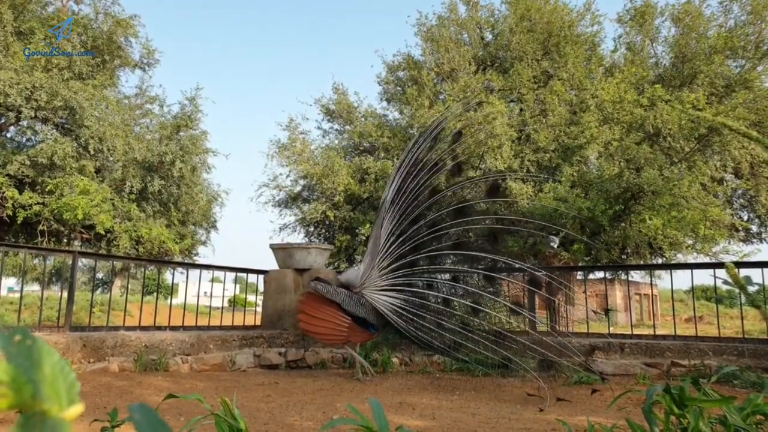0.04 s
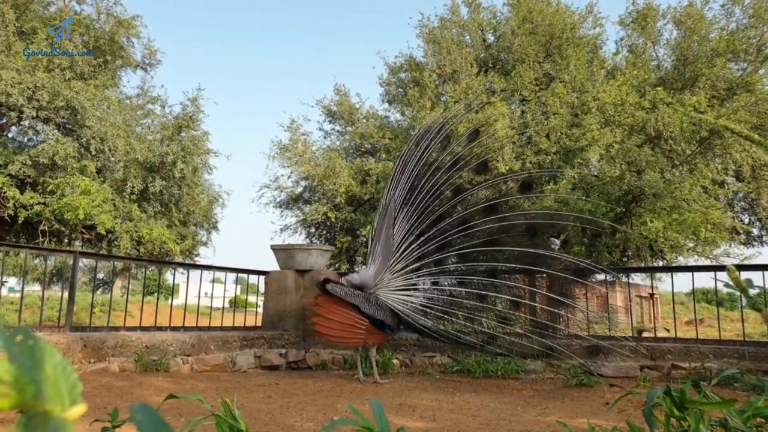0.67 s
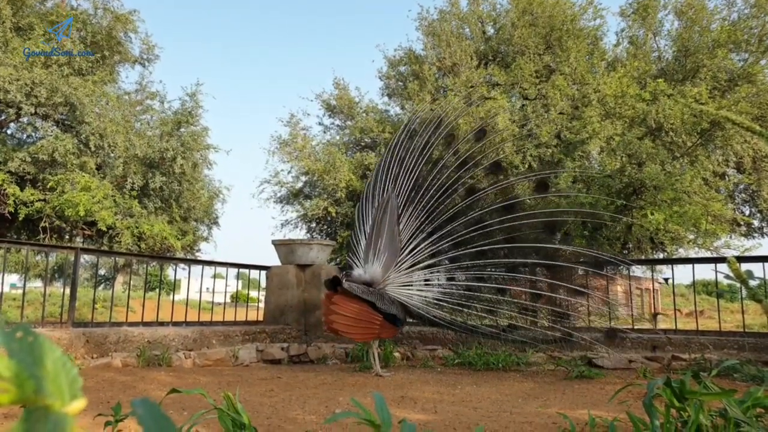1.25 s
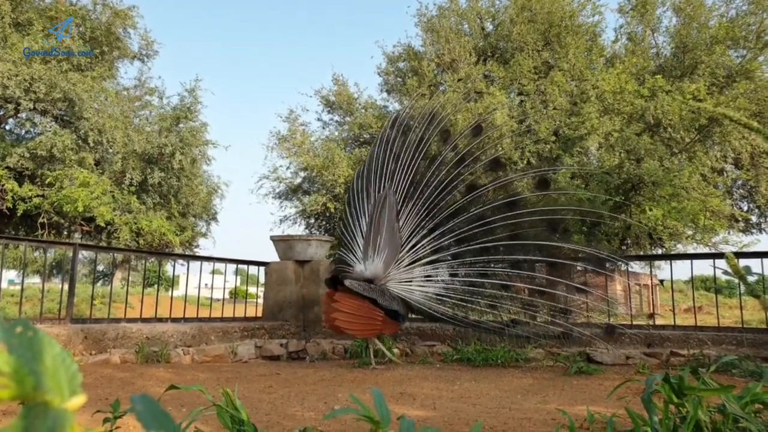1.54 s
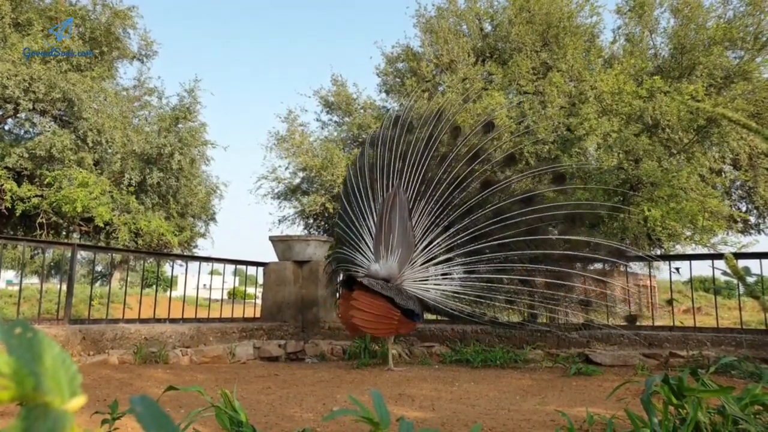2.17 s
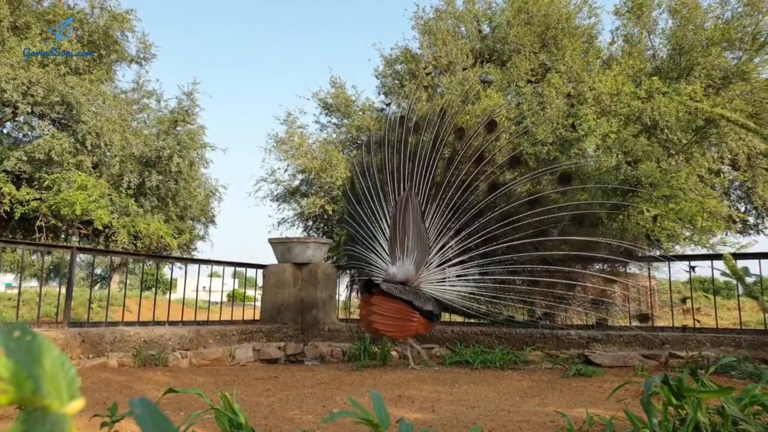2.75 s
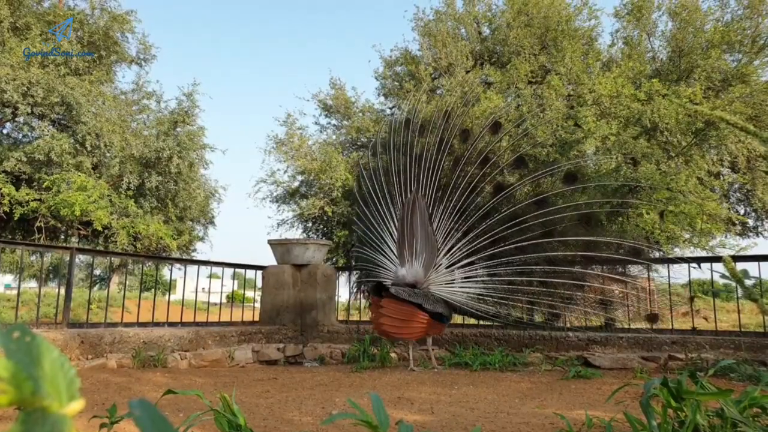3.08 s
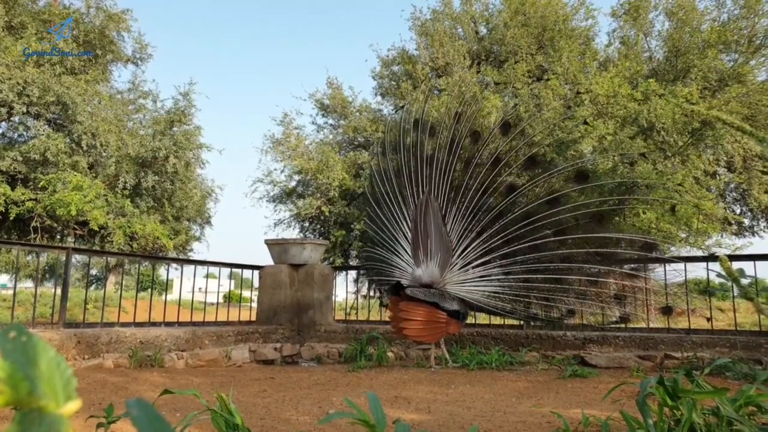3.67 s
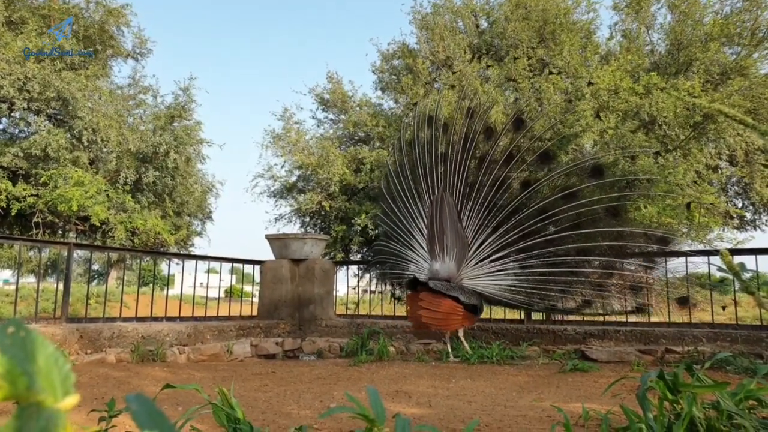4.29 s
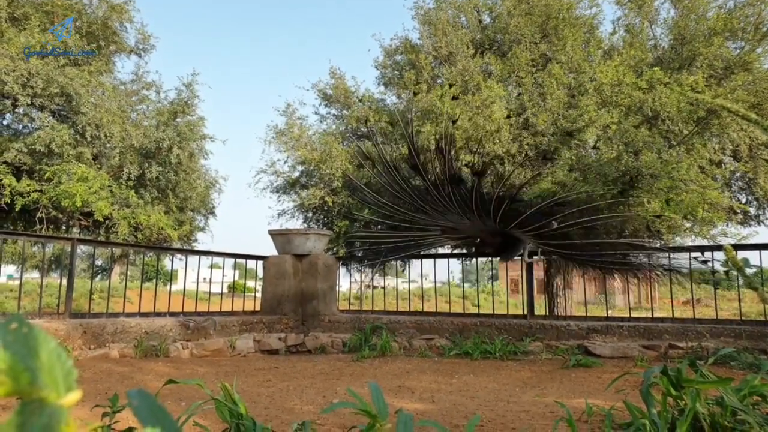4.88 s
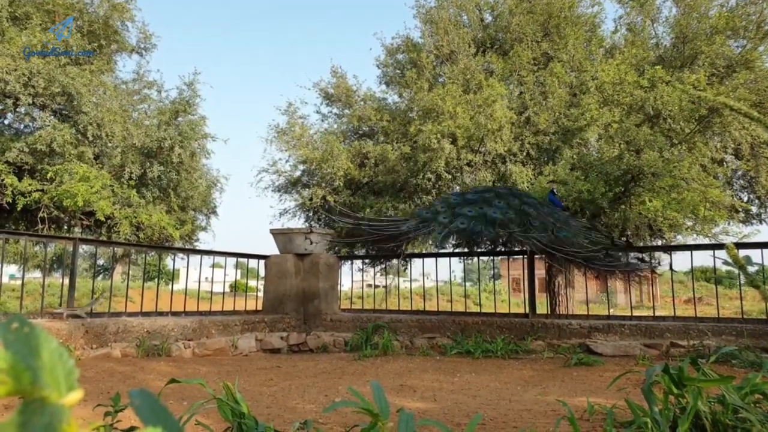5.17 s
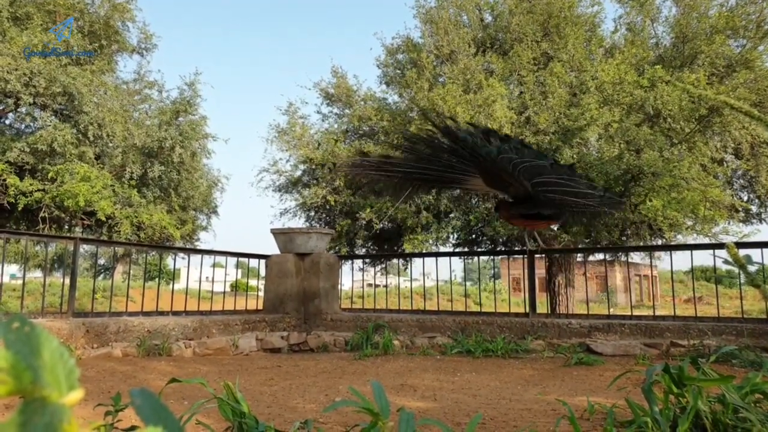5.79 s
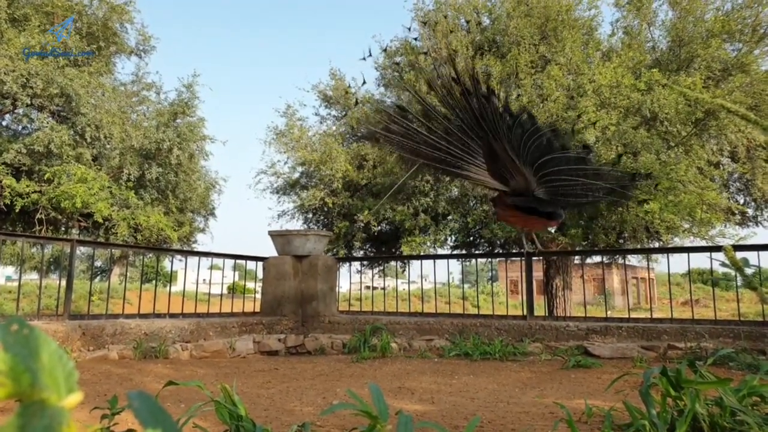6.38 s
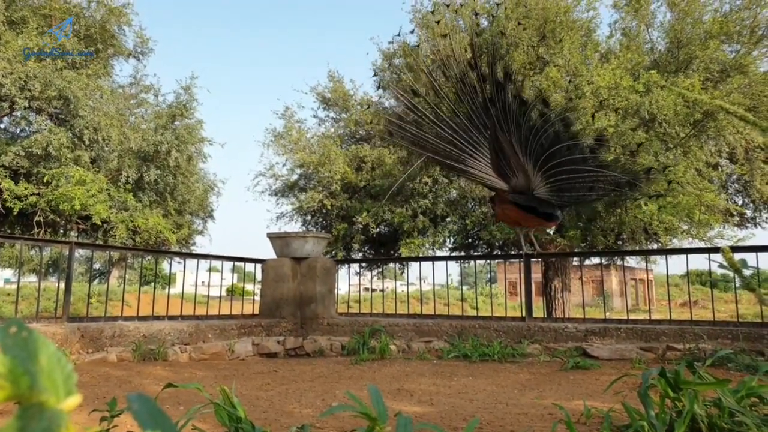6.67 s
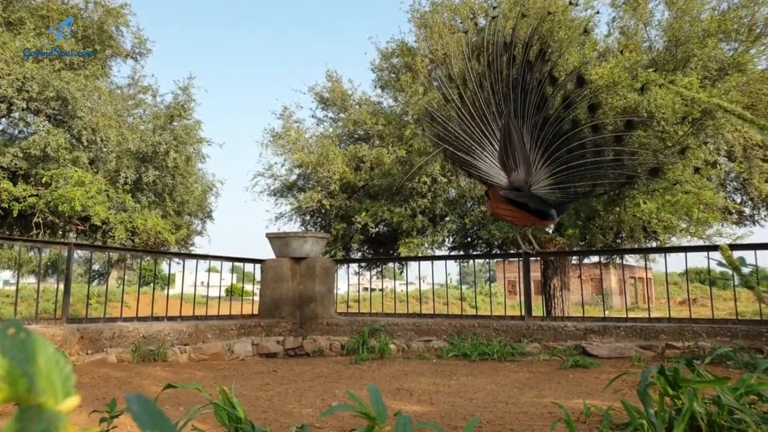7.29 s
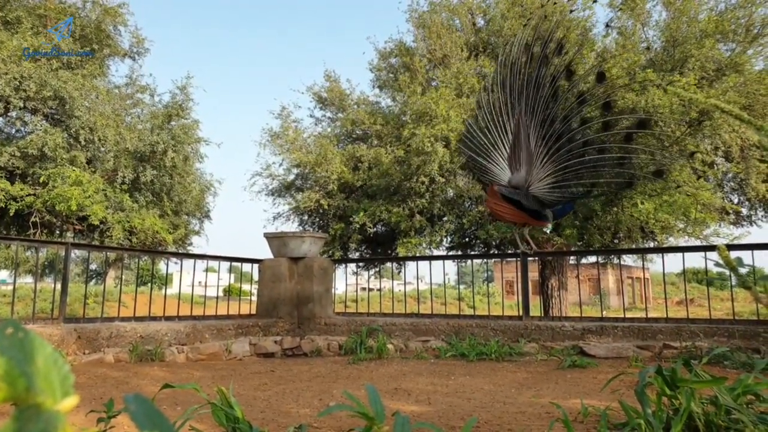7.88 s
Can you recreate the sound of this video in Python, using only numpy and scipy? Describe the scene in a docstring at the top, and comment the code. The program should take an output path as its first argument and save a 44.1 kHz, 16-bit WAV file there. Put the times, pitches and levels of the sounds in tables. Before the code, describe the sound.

The sound opens in an outdoor yard with a faint hum and hiss, and a light breeze rumbling unevenly on the microphone throughout. Distant peafowl give arched, wailing cries at about 0.8, 1.8 and 2.9 seconds, among scattered hoarse squawks, thin whistles and twitters from small birds. A peacock close by gives three loud, short, harsh honks with a brassy flutter at about 3.8, 4.3 and 5.3 seconds. His feathers rustle softly and quills snap between 4.6 and 5.2 seconds. Small birds continue, with clearer squawks at 5.6, 6.3 and 6.8 seconds. His feet click lightly on a railing at 6.7 and from 7.4 to 7.8 seconds, and his quills rattle faintly until the end, around 8 seconds. Dull handling bumps come near 0.3, 2.7, 6.7 and 7.6 seconds, the strongest at 6.7. The calls carry a slight outdoor echo.

```python
"""Three harsh, fluttering honks from a peacock displaying close by in a yard; his quills rustle and he hops
onto a railing. His syrinx buzzes, a fast flutter chops the buzz, and his windpipe turns it brassy.
Farther off, other peafowl wail and small birds squawk, whistle and twitter over a faint hum and hiss.
Low walls and trees answer the calls. A breeze buffets the microphone's two unlike ports, and handling
adds soft bumps."""
import sys
import numpy as np
from scipy import signal
from scipy.fft import rfft, irfft, next_fast_len
from scipy.io import wavfile
from scipy.ndimage import uniform_filter1d, map_coordinates

SR = 44100
rng = np.random.default_rng(int(sys.argv[2]) if len(sys.argv) > 2 else 0)


def dump_mix(stems):
    """Bounce the given channels to the path in sys.argv[1] as a 16-bit WAV at rate SR."""
    frames = np.atleast_2d(stems).T  # one column per channel
    limited = np.clip(frames, -1, 1)  # hard clip at full scale
    pcm = np.round(limited * 32767).astype(np.int16)
    wavfile.write(sys.argv[1], SR, pcm)


N = 358974
TOP_HZ = 15500  # upper edge of the microphone's band


def honks(length_s=0.25, attack_s=0.08, release_s=0.056, opening_s=0.11, hold_hz=396, roughness=0.26):
    """Close by, the syrinx buzzes; a flutter chops it and bends its pitch, and each puff carries a rasp."""
    # the peacock's calls: t/s, level/dB, rasp/dB
    calls = [(3.78, -30.5, -4.5), (4.274, -29.5, -3.5), (5.298, -29.5, -3.5)]
    # the voice's colour at the left and at the right port: f/Hz, gain/dB
    left_colour = [(300, -19), (450, -38), (700, -13), (1020, -7), (1550, -2), (2100, -2), (2600, -36),
                   (3300, -18.5), (4100, -17), (5200, -20), (7000, -24), (9000, -26), (11800, -22.5),
                   (15000, -38)]
    right_colour = [(300, -58.5), (570, -2), (790, -4.5), (1020, -11.5), (1250, 1.5), (2330, -6.5),
                    (3250, -28.5), (3850, -9), (4600, -20), (6100, -8.5), (7600, -15), (11500, -15.5),
                    (13500, -45)]
    out = np.zeros((2, N))
    t = clock(0, length_s)
    slack = np.clip(1 - t / attack_s, 0, 1)
    collapse = np.clip(1 - (length_s - t) / release_s, 0, 1)
    effort_db = -26 * (slack ** 1.32 + collapse ** 1.72)
    pitch = hold_hz - 80.95 * np.exp(-(t / 0.064) ** 2) - 161.4 * collapse  # scoops up, holds, drops
    depth = 0.083 + 0.85 * slack ** 2 + 0.18 * collapse  # a weak voice breaks up into single puffs
    bright_db = 5 * slack - 26 * collapse ** 2
    order = np.arange(1, 38)[:, None]
    lag = np.pi * order ** 2 / (2 * len(order))  # the windpipe smears each pulse over part of its cycle
    beak_hz = 1530 + 1260 * t - 735 * collapse  # this resonance rises as the beak opens, falls as it shuts
    beak_lift = amp(4 * np.exp(-((order * pitch - beak_hz) / 400) ** 2))
    opened = np.clip(t / opening_s, 0, 1) ** 2
    for start, db, rasp_db in calls:
        flutter_hz = (84.5 - 67 * t) * (1 + 0.015 * wobble(t, 50))
        flutter = np.sin(cycles(flutter_hz))
        phase = cycles(pitch * (1 + 0.066 * flutter + 0.01094 * wobble(t, 350.3)))
        buzz = unit((beak_lift * np.cos(order * phase + lag)).sum(axis=0))
        breath = rng.standard_normal(len(t))
        scattered = tint(rng.standard_normal((2, len(t))), [(2000, 1.5), (4000, 3)])
        air = unit((breath + 0.97 * scattered) * (0.97 + np.cos(phase)))
        source = buzz + roughness * colour(air, [(600, -30), (2000, 19), (5000, 17)])
        # the flutter chops the lowest harmonics and the rasp more deeply than the blare between them
        low = tint(source, [(950, -3), (1200, -20.5)]) * (1 + 1.46 * flutter) * amp(-1.5)
        blare = tint(source, [(950, 0.5), (1150, -1), (1500, 1.5), (2800, 6.5), (3600, -12.5)])
        blare *= 1 + depth * flutter
        rasp = windpipe(tint(source, [(3200, -23), (3650, 2)])) * amp(5 * flutter + rasp_db + bright_db)
        # the top of the rasp only gets out once the beak is wide open
        rasp = opened * rasp + (1 - opened) * tint(rasp, [(8500, 2), (9300, -12)])
        left, right = spaced(low, samples=14) + spaced(blare + rasp, samples=20)
        pair = np.array([tint(left, left_colour), tint(right, right_colour)])
        honk = unit(quickened(pair, share=0.0665))
        add(out, start, honk * amp(db + effort_db + 0.5) * fade(t, 0.00056))
    return yard(out, wall_db=-12, tail_db=-29)


def windpipe(x):
    """Narrow resonances of the windpipe make the rasp brassy."""
    # windpipe resonances: f/Hz, width/Hz, lift over the valleys/dB
    resonances = [(3750, 230, 6.5), (6150, 114, 11), (6390, 130, 0), (8170, 400, 4.5), (11500, 300, 4)]
    hz = np.arange(1, 320) * 50.0
    lift_db = sum(db * np.exp(-((hz - centre) / width) ** 2) for centre, width, db in resonances)
    return tint(x, np.transpose([hz, lift_db - 3]))


def feathers_and_feet(shiver_hz=40, click_t60=0.01, ring_t60=0.015, rattle_hz=36):
    """The near bird's quills slide, snap and rattle as his train shivers; his feet click on the railing."""
    # rustling strokes of the train: t/s, length/s, level/dB
    strokes = [(4.036, 0.26, -74.5), (4.646, 0.2, -61.5), (4.792, 0.064, -59.5), (4.878, .22, -64.5),
               (5.144, 0.066, -61.5)]
    # sharp clicks of quills snapping and of feet landing on the railing: t/s, level/dB, ring f/Hz
    clicks = [(3.4934, -46.5, 3400), (4.6628, -39.5, 3660), (4.7366, -43, 2900), (4.81, -30.5, 10770),
              (4.9842, -44.5, 5000), (5.1647, -31.5, 2730), (6.7234, -37.5, 5040), (7.3876, -44, 5280),
              (7.59, -53, 5330), (7.6466, -49, 5650), (7.7112, -45.5, 5430), (7.7545, -41, 5080),
              (7.8007, -46.5, 5870)]
    # colour of the rustle and clicks: f/Hz, gain/dB
    rustle_colour = [(300, 1.5), (1400, -10), (2800, 3), (4200, -4), (5200, -0.5), (8500, -5),
                     (11000, -0.5), (14000, -4), (16000, -17)]
    out, rings = np.zeros((2, N)), np.zeros(N)
    for start, length, db in strokes:
        t = clock(start, start + length)
        swell_db = np.interp(t - start, [0, 0.28 * length, length], [-12, 0, -12])
        shiver = np.cumsum(shiver_hz * amp(2.2 * wobble(t, 30))) / SR % 1  # each starts sharply and dies
        friction = rng.standard_normal((2, len(t)))
        grains = unit(friction * amp(3 * wobble(t, 297) - 12 * np.sqrt(shiver)))
        add(out, start, grains * amp(db + swell_db + 11) * fade(t, 0.014))
    t = clock(0, 0.021)
    decay = amp(-60 * t / click_t60)
    for start, db, hz in clicks:
        add(out, start, rng.standard_normal((2, len(t))) * decay * amp(db - 7))
        add(rings, start, np.sin(2 * np.pi * hz * t) * amp(db - 5 - 60 * t / ring_t60))
    for beat in np.arange(7.56, 8.12, 1 / rattle_hz):  # the raised train trembles
        start = beat + rng.normal(0, 0.005)
        crack = rng.standard_normal((2, len(t))) * decay
        add(out, start, crack * amp(-60.5 + rng.normal(0, 3)))
    return yard(colour(out, rustle_colour) + rings, wall_db=-2, tail_db=-30)


def wails(sag=0.22, edge_db=-24, roughness=0.4):
    """Peafowl farther off: arched cries, loudest at their top and hoarse in the upper harmonics."""
    # the cries: t/s, length/s, top f/Hz, level/dB, treble/dB, left-right/dB
    cries = [(0.561, 0.32, 655, -63.5, 2.5, 0.5), (0.768, 0.34, 745.7, -52, 1, 0),
             (1.767, 0.34, 732.5, -50.5, 6.5, 1), (2.9, .34, 650.4, -52, 12, 7.5),
             (7.249, 0.17, 786, -69, -36, -8)]
    # resonances of the throat: f/Hz, gain/dB
    throat = [(400, -39), (640, -4.5), (750, 2.5), (1000, -6), (1330, -2), (1800, -18), (2550, 6),
              (3150, -6.5), (3750, 7), (4500, -16), (5600, -2.5), (7000, -18), (9500, -30), (13000, -36)]
    out = np.zeros((2, N))
    for start, length, top_hz, db, treble_db, pan_db in cries:
        t = clock(start, start + length)
        droop = np.linspace(-1, 1, len(t)) ** 2
        phase = cycles(top_hz * (1 - sag * droop) * (1 + 0.019 * wobble(t, 300)))
        buzz = unit(np.cos(np.arange(1, 19)[:, None] * phase).sum(axis=0))
        air = colour(rng.standard_normal(len(t)), [(700, -10), (2500, 1), (6000, 7), (12000, 2)])
        voice = colour(buzz + roughness * air, throat)
        cry = unit(tint(voice, [(1000, 0), (2600, treble_db / 2), (8000, treble_db), (14000, 0)]))
        add(out, start, sides(pan_db) * cry * amp(db + edge_db * droop ** 1.9) * fade(t, 0.0082))
    return yard(spaced(out, samples=10), wall_db=-5, tail_db=-10)


def squawks(top_share=0.3, hoarse_db=-14, jitter=0.02):
    """Hoarse notes that leap to a top and slide down, sung by both halves of a small bird's syrinx."""
    # the notes: t/s, length/s, top f/Hz, slide/octaves, level/dB, tilt/dB per octave, left-right/dB
    notes = [(0.275, .115, 2253, 0.49, -51.5, 5.5, 0.5), (0.944, 0.057, 2290, 0.62, -56.5, 4, -2),
             (1.185, 0.082, 2440, 0.52, -66.5, -13, 8), (1.331, 0.15, 2854, 0.54, -65, 3.5, 0.5),
             (1.535, 0.094, 2217, 0.49, -53.5, 5, -0.5), (2.203, 0.087, 2178, 0.53, -58, 5, 3),
             (2.834, 0.091, 2140, 0.3, -56, 9, 2), (4.137, 0.088, 2045, 0.35, -50.5, 1.5, 1.5),
             (4.612, 0.12, 1890, .3, -57, 8, 12), (4.825, 0.11, 1990, .3, -52, 9, 12),
             (5.64, .11, 2094, .55, -48.5, 6, 0.5), (6.335, .16, 2310, 0.62, -41.5, 10, 7.5),
             (6.754, .18, 1840, 0.26, -46, 14, 11.5), (7.155, 0.16, 1767, 0.2, -74.5, 3, -9),
             (7.779, 0.17, 1744, 0.27, -67, 4.5, -6)]
    # resonances of the throat: f/Hz, gain/dB
    throat = [(1400, 9.5), (2100, -3), (3000, 8.5), (3750, 7.5), (4700, 1), (5700, 1), (6600, -14),
              (7600, -13), (9200, -18.5), (13000, -42)]
    halves = [(0, 1, 0), (0.018, 0.9, -8)]  # delay/s, pitch ratio, level/dB
    order = np.arange(2, 14)[:, None] / 2
    hoarseness = np.where(order % 1, amp(hoarse_db), 1)  # weaker lines halfway between the harmonics
    out = np.zeros((2, N))
    for start, length, top_hz, slide, db, tilt_db, pan_db in notes:
        t = clock(start, start + length)
        progress = np.linspace(0, 1, len(t))
        leap = 0.67 * (1 - progress / top_share) ** 2
        fall = abs((progress - top_share) / (1 - top_share)) ** 1.5
        below_top = np.where(progress < top_share, leap, fall)
        for delay, ratio, half_db in halves:
            pitch = ratio * top_hz * 2 ** (-slide * below_top)
            hz = order * pitch
            weight = amp(along(throat, hz) + tilt_db * np.log2(order)) * hoarseness * (hz < TOP_HZ)
            flicker = amp(4 * np.array([wobble(t, 45) for _ in order]))
            phase = cycles(pitch * (1 + jitter * wobble(t, 351.3)))
            note = unit((weight * flicker * np.sin(order * phase)).sum(axis=0))
            add(out, start + delay, sides(pan_db) * note * fade(t, length / 4) * amp(db + half_db - 1))
    return out


def whistles(jitter=0.015):
    """Small birds slur one thin line up or down."""
    # the slurs: t/s, length/s, from f/Hz, to f/Hz, level/dB
    slurs = [(1.148, 0.063, 3350, 3770, -59), (2.113, 0.043, 5750, 5050, -69),
             (5.014, 0.022, 2700, 4440, -56.5), (5.07, 0.039, 3950, 2350, -52),
             (5.123, 0.072, 3900, 3370, -60), (5.954, 0.075, 3870, 5080, -65.5),
             (6.145, .07, 5350, 4900, -71.5), (7.342, 0.034, 5400, 5020, -71),
             (7.55, 0.057, 5450, 5080, -68.5), (7.665, 0.059, 5400, 5050, -67),
             (7.889, 0.051, 5450, 5000, -60.5)]
    out = np.zeros(N)
    for start, length, from_hz, to_hz, db in slurs:
        t = clock(start, start + length)
        pitch = np.geomspace(from_hz, to_hz, len(t)) * (1 + jitter * wobble(t, 228))
        add(out, start, unit(np.sin(cycles(pitch))) * fade(t, length / 4) * amp(db))
    return out


def small_birds():
    """Squawks and whistles reach the microphone from the same trees."""
    return yard(spaced(squawks() + whistles(), samples=14), wall_db=-5, tail_db=-9)


def twitters(sweeps_per_s=45):
    """Distant, scratchy runs of very quick sweeps, each run sinking in pitch."""
    # the runs: t/s, length/s, nominal sweep from f/Hz, to f/Hz, level/dB, left-right/dB
    runs = [(0, .19, 3850, 2517, -63.5, 4), (1.839, 0.074, 3400, 2530, -64, -18),
            (2.424, 0.096, 4050, 2940, -68, 16), (2.657, 0.098, 4140, 3000, -68, 13),
            (3.411, 0.13, 4130, 3080, -64.5, 12), (3.647, 0.13, 4170, 3150, -61, 13),
            (5.697, 0.26, 4370, 2720, -67, 1), (6.898, 0.11, 4720, 6520, -63, 10),
            (7.168, 0.027, 6500, 5110, -69, 6), (7.47, 0.054, 4440, 6600, -65.5, 9),
            (8.018, 0.062, 4670, 6700, -62.5, 6.5)]
    out = np.zeros((2, N))
    for start, length, from_hz, to_hz, db, pan_db in runs:
        t = clock(start, start + length)
        sweep = np.cumsum(sweeps_per_s * amp(3.6 * wobble(t, 40))) / SR % 1
        sink = np.linspace(1.06, 0.92, len(t))
        pitch = (from_hz + (to_hz - from_hz) * sweep) * (1 + 0.0426 * wobble(t, 123.4)) * sink
        run = unit(np.sin(cycles(pitch)) * np.sin(np.pi * sweep))
        add(out, start, sides(pan_db) * run * fade(t, length / 3) * amp(db + 3.5))
    return yard(spaced(out, samples=14), wall_db=1, tail_db=-6)


def breeze(calm_db=-57, attack_s=0.026, release_s=0.064):
    """Gusts swell and die over a light breeze; their lumps of air buffet the microphone ports."""
    # gusts on the ports: t/s, length/s, level/dB, left-right/dB
    gusts = [(0.133, 0.12, -43.5, -28), (0.681, 0.34, -45.5, -29), (0.953, 0.31, -42.5, -2),
             (1.253, 0.18, -48, -2), (1.472, 0.25, -49, 5), (1.677, .14, -48, -15), (1.84, .4, -45.5, -24),
             (2.609, 0.23, -44.5, -16), (2.815, 0.27, -53, -9), (3.698, 0.15, -45, -24),
             (3.992, 0.44, -47.5, -28), (4.695, 0.24, -56.5, -15), (5.02, 0.17, -49.5, -5),
             (5.944, 0.13, -42, -25), (6.124, 0.28, -47, -25), (6.492, 0.32, -46.5, -34),
             (6.935, 0.3, -51.5, -14), (7.23, 0.37, -50, -33), (7.636, 0.21, -46, -32)]
    # colour of the wind's rumble: f/Hz, gain/dB
    rumble = [(22, -39), (46, 2), (72, 2), (152, -8), (304, -25), (356, -25), (500, -33.5), (650, -29),
              (1100, -120)]
    power = np.ones((2, N)) * (amp(calm_db) * sides(pan_db=-4)) ** 2
    for start, length, db, pan_db in gusts:
        t = clock(0, length)
        swell = np.clip(np.minimum(t / attack_s, (length - t) / release_s), 0, 1)
        add(power, start, (amp(db) * sides(pan_db) * swell) ** 2)
    lumps = amp(1.5 * wobble(clock(0, N / SR), 25))
    return unit(rush(rumble, patchy_db=2) * lumps) * np.sqrt(power)


def handling_bumps(thud_t60=0.06, knock_t60=0.024):
    """Handling bumps the microphone, mostly at the right port: a low push with a short knock."""
    # handling bumps: t/s, thud level/dB, knock level/dB, thud f/Hz
    hits = [(0.34, -33, -51, 74), (0.354, -26.5, -55, 80), (0.844, -56, -48.5, 83.4),
            (2.656, -36, -52.5, 74), (2.689, -33.5, -53, 137), (3.741, -38, -58.5, 61),
            (4.182, -90, -47, 67.5), (4.209, -41, -47, 155), (5.955, -39, -61, 71.4),
            (6.726, -20.5, -49.5, 121), (7.588, -32, -52.5, 83)]
    # colour of the knock: f/Hz, gain/dB
    knock_colour = [(150, 3), (500, -1), (1000, -7), (1600, -19.5), (2500, -7.5), (4000, -40), (9000, -54)]
    out, t = np.zeros(N), clock(0, 0.085)
    for start, thud_db, knock_db, thud_hz in hits:
        thud = np.sin(2 * np.pi * thud_hz * t) * amp(thud_db + 2 - 60 * t / thud_t60)
        knock = unit(colour(rng.standard_normal(len(t)), knock_colour))
        add(out, start, thud + knock * amp(knock_db + 12 - 60 * t / knock_t60))
    return out * amp([[-17], [0]])


def countryside():
    """Beyond the yard, a far hum and a faint background hiss that swells with the echo of bird calls."""
    # course of the hiss and of the hum: t/s, level/dB
    hiss_levels = [(0.0, -68.5), (0.61, -78.5), (0.93, -64), (1.4, -72.5), (2.11, -69.5), (2.43, -72),
                   (2.79, -74), (2.99, -64), (3.6, -72.5), (4.08, -63.5), (6.3, -71.5), (6.6, -63.5),
                   (7.12, -69), (8.14, -69)]
    hum_levels = [(0.0, -84), (0.45, -77), (0.91, -64.5), (1.22, -77), (1.81, -76.5), (1.97, -66),
                  (2.24, -78), (2.79, -74.5), (3.72, -75.5), (3.92, -68.5), (4.76, -69), (4.94, -65),
                  (5.49, -68.5), (5.6, -71), (8.14, -90)]
    # their colours: f/Hz, gain/dB
    hiss_colour = [(900, -9.5), (1800, -12), (2550, 2.5), (2950, -10.5), (3500, -19.5), (4300, -5.5),
                   (5400, -4), (6200, -1.5), (7200, -11), (10000, -16.5), (14000, -19)]
    hum_colour = [(100, -10), (300, -5), (560, -3), (625, 7.5), (690, -1.5), (800, -4), (950, -31.5),
                  (1600, -23.5), (4000, -12), (8000, -36), (15000, -29)]
    t = clock(0, N / SR)
    hiss = rush(hiss_colour, patchy_db=2.5) * amp(np.interp(t, *np.transpose(hiss_levels)) + 3)
    hum = rush(hum_colour, patchy_db=2.5) * amp(np.interp(t, *np.transpose(hum_levels)) + 7)
    return hiss + hum


def yard(pair, wall_db, tail_db, wall_t60=0.15):
    """Ground and low walls answer at once, the trees with a soft tail."""
    # decay of the tail: f/Hz, t60/s
    tail_t60 = [(200, 0.28), (700, 0.5), (2500, 0.79), (6000, 0.32), (12000, 0.22)]
    hz, frame_s, bands = signal.stft(rng.standard_normal((2, SR)), SR, nperseg=256)
    decay = amp(-60 * frame_s / along(tail_t60, hz)[:, None])
    tail = signal.istft(bands * decay, SR, nperseg=256)[1][:, :SR]
    t = clock(0, 1)
    walls = rng.standard_normal((2, SR)) * amp(-60 * t / wall_t60) * (t > 0.001)
    answer = amp(wall_db) * unit(walls) + amp(tail_db) * unit(tail * (t > 0.012))
    return pair + signal.fftconvolve(pair, answer / np.sqrt(SR), axes=1)[:, :N]


def amp(db):
    """Decibels to gain."""
    return 10 ** (np.asarray(db) / 20)


def unit(x):
    """Scale to rms 1."""
    return x / np.sqrt(np.mean(x ** 2) + 1e-20)


def along(points, hz):
    """Interpolate (f/Hz, value) points on a log frequency axis."""
    freqs, values = np.transpose(points)
    return np.interp(np.log(hz + 1), np.log(freqs + 1), values)


def clock(start, end):
    """Sample times between two moments."""
    return np.arange(round(start * SR), round(end * SR)) / SR


def wobble(t, rate):
    """A smooth random curve, rate knots a second."""
    knots = (t - t[0]) * rate
    return map_coordinates(rng.standard_normal(int(knots[-1]) + 4), [knots])


def cycles(hz):
    """Running phase of a moving frequency, in radians."""
    return 2 * np.pi * np.cumsum(hz) / SR


def fade(t, edge_s):
    """Soft start and end."""
    return np.clip(np.minimum(t - t[0], t[-1] - t) / edge_s, 0, 1)


def add(track, start, x):
    """Mix x into a track at a time in seconds."""
    part = track[..., max(round(start * SR), 0):][..., :x.shape[-1]]
    part += x[..., :part.shape[-1]]


def colour(x, points):
    """Causal, minimum-phase filter through (f/Hz, gain/dB) points."""
    size = 2 * next_fast_len(x.shape[-1] // 2 + 4096)
    cepstrum = irfft(np.log(amp(along(points, np.fft.rfftfreq(size, 1 / SR)))))
    cepstrum[1:size // 2] *= 2
    cepstrum[size // 2 + 1:] = 0
    return irfft(rfft(x, size) * np.exp(rfft(cepstrum)), size)[..., :x.shape[-1]]


def tint(x, points):
    """Zero-phase filter through (f/Hz, gain/dB) points; it keeps the timing between the ports."""
    size = next_fast_len(x.shape[-1] + 4096)
    gain = amp(along(points, np.fft.rfftfreq(size, 1 / SR)))
    return irfft(rfft(x, size) * gain, size)[..., :x.shape[-1]]


def rush(spectrum, patchy_db):
    """A coloured noise for each port, rms 1, with patches of random gain in time and frequency."""
    bands = signal.stft(rng.standard_normal((2, N)), nperseg=512)[2]
    patches = uniform_filter1d(rng.standard_normal(bands.shape[1:]), size=6, axis=0)
    patches = unit(uniform_filter1d(patches, size=12, axis=1))
    noise = signal.istft(bands * amp(patchy_db * patches), nperseg=512)[1][:, :N]
    return unit(colour(noise, spectrum))


def quickened(pair, share):
    """Run a sound ever faster, so that pitch and resonances rise by about a share from start to end."""
    progress = np.linspace(0, 1, pair.shape[-1])
    place = (progress + share * progress * (progress - 1) / 2) * (len(progress) - 1)
    return np.array([map_coordinates(x, [place], order=5) for x in pair])


def spaced(x, samples):
    """The sound reaches the right port some samples after the left."""
    left, right = np.broadcast_to(x, (2, x.shape[-1]))
    return np.array([left, np.pad(right, (samples, 0))[:len(left)]])


def sides(pan_db):
    """Left and right gains of unchanged total power."""
    return unit(amp(np.array([[pan_db], [-pan_db]]) / 2))


def scene():
    """The near honks, the yard tinted by the two ports, and wind and handling on the microphone."""
    # imbalance of the two ports: f/Hz, left-right/dB
    ports = [(100, -12.5), (380, -4.5), (620, 11.5), (1350, -0.5), (2500, -11), (3300, -9.5), (4400, -8.5),
             (5300, -23), (6500, -9.5), (9500, -10), (13000, -1.5)]
    left, right = wails() + small_birds() + twitters() + feathers_and_feet() + countryside()
    left = tint(left, [(hz, db / 2) for hz, db in ports])
    right = tint(right, [(hz, -db / 2) for hz, db in ports])
    return honks() + amp(-1) * np.array([left, right]) + breeze() + handling_bumps()


def record(dry):
    """The microphone keeps nothing above its band limit."""
    size = next_fast_len(N + SR // 2)
    in_band = np.fft.rfftfreq(size, 1 / SR) < TOP_HZ
    return irfft(rfft(dry, size) * in_band, size)[:, :N]


dry = scene()
out = record(dry)
dump_mix(out)
```